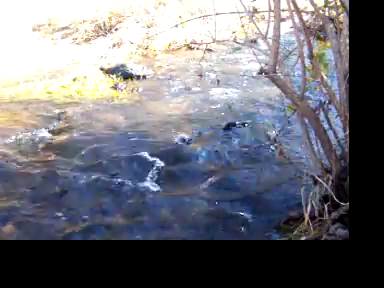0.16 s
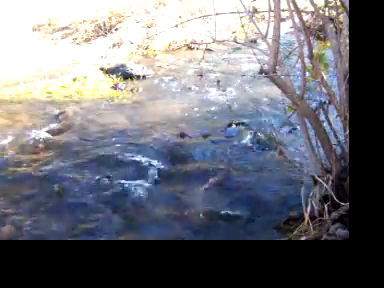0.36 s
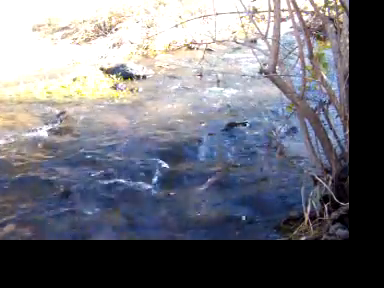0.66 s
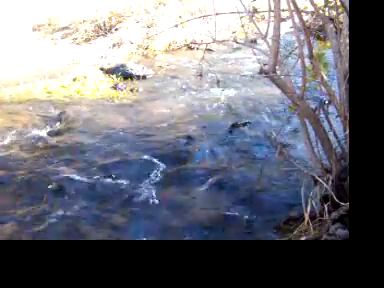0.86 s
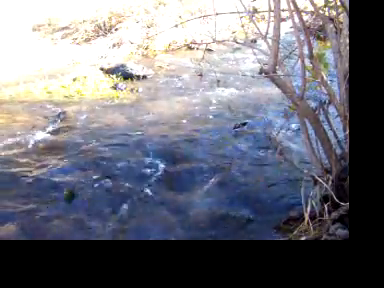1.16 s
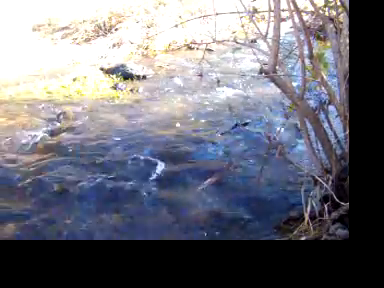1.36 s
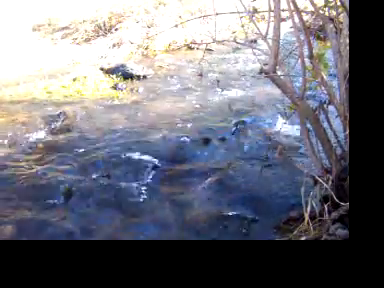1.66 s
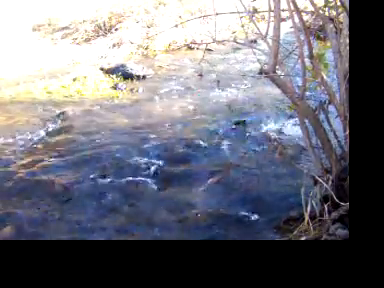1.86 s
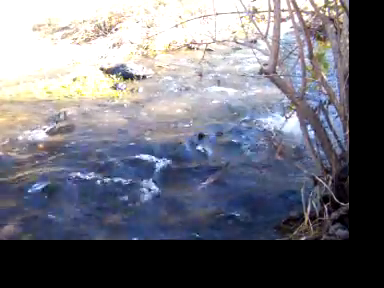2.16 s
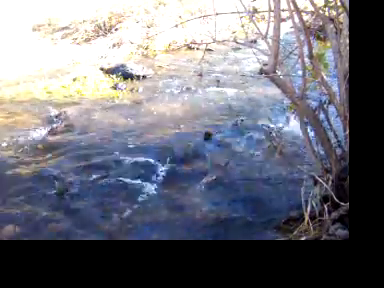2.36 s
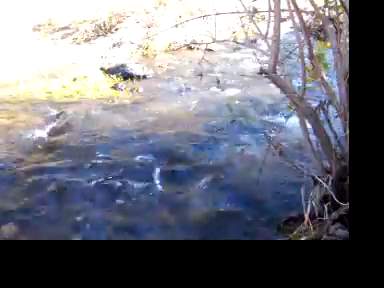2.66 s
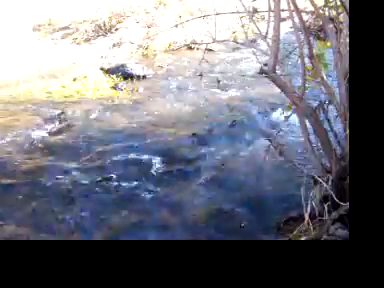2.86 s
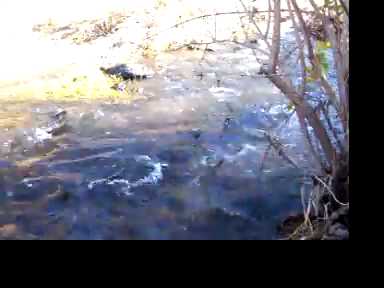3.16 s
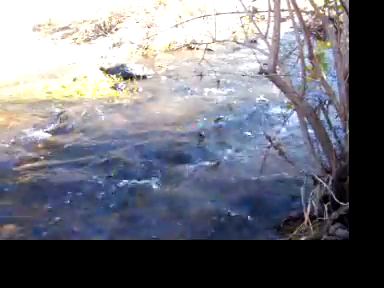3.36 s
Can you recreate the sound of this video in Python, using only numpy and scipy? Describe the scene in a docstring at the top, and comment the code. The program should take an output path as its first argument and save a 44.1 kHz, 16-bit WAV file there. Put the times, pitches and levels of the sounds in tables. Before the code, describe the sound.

A shallow stream rushes steadily over stones for about three and a half seconds, heard from the bank. Fine bubbling and spray ride on the flow, with small close plinks and drop splashes from around 0.4 seconds. Between 1.5 and 2.2 seconds the water churns harder and a run of deeper gurgles rises, strongest near 1.9. Scattered gurgles and drips continue over the rush to the end.

```python
"""A steady rush of water: a shallow stream over stones, from the bank, on a small mono microphone.
Swarms of tiny ringing bubbles and fine spray ride on it, swelling as the water churns and wavelets
break. Close to the microphone single bubbles plink and drops slap the surface; halfway through,
a run of big air pockets gurgles up. A limiter ducks the stream briefly after the sharpest peaks."""
import sys
import numpy as np
from scipy import signal
from scipy.fft import rfft, irfft, next_fast_len
from scipy.io import wavfile
from scipy.ndimage import uniform_filter1d

SR = 44100
rng = np.random.default_rng(int(sys.argv[2]) if len(sys.argv) > 2 else 0)


def dump_mix(stems):
    """Bounce the given channels to the path in sys.argv[1] as a 16-bit WAV at rate SR."""
    frames = np.atleast_2d(stems).T  # one column per channel
    limited = np.clip(frames, -1, 1)  # hard clip at full scale
    pcm = np.round(limited * 32767).astype(np.int16)
    wavfile.write(sys.argv[1], SR, pcm)


N = 154791

# how hard the water churns: t/s, level/dB
CHURN_LEVEL = [(0, -1.5), (.45, -1.5), (.55, -3), (.9, -1.5), (1.25, -2.1), (1.5, 0), (1.8, -2.5),
               (1.87, 8), (2, 0), (2.08, 0), (2.22, -.5), (2.35, 1.5), (2.68, 0.5), (2.9, 1.5), (3.1, 0.5),
               (3.3, 3), (3.43, -1), (3.51, 2)]
# wavelets breaking: t/s at the crest, length/s, extra churn/dB
WAVELETS = [(0.498, .03, 1.5), (1.002, 0.018, 1), (1.331, 0.028, 4), (1.509, 0.02, 9), (1.568, 0.025, 6),
            (1.608, .04, 4.5), (1.71, 0.039, 6.5), (1.796, 0.078, 6), (1.915, 0.015, 5.5),
            (2.116, 0.018, 4), (2.169, .04, 5), (2.276, 0.057, 2.5), (2.39, 0.029, 5), (2.537, 0.052, 2.5),
            (2.577, 0.052, 1.5), (2.718, 0.017, 5.5), (3.069, 0.038, 3.5), (3.19, .03, 0.5),
            (3.344, 0.033, 4)]
# the rush from the bank: f/Hz, relative level/dB
RUSH_SPECTRUM = [(15, -34), (28, -18.5), (60, -10), (90, -4.5), (109, -6.5), (130, -9), (200, -6),
                 (400, -5), (530, -5.5), (605, -2.5), (700, -8), (800, -7.5), (940, -11.5), (1070, -14),
                 (1190, -9.5), (1900, -8), (2500, -12), (3500, -11.5), (4800, -10), (6800, -15),
                 (7900, -25), (8800, -42), (9500, -76.5)]
# how closely the rush follows the churn: f/Hz, follow/(dB per dB)
RUSH_FOLLOW = [(100, .1), (600, 0.29), (1500, 0.48), (5000, 1.0)]
# bubble swarms: lowest f/Hz, highest f/Hz, rate/(1/s), spread/dB, level/dB, follow/(dB per dB), ring/cycles
BUBBLE_SWARMS = [(333, 560, 180, 5.5, -38, 1.5, 4), (579, 690, 160, 2, -33.5, 0.28, 9.5),
                 (700, 950, 90, 0, -42, 1.6, 4.6), (1196, 2200, 260, 3.5, -36.5, 1.35, 8.5),
                 (2310, 4000, 900, 4, -34, 0.45, 4.5), (3990, 7220, 1500, 5, -30.5, 0.56, 3)]
# fine spray: f/Hz, rate/(1/s), spread/dB, level/dB
FINE_SPRAY = [(3700, 200, 5, -36), (7700, 190, 4.5, -39)]
# small bubbles near the microphone: t/s, f/Hz, level/dB
CLOSE_BUBBLES = [(.353, 4840, -10), (.4033, 5370, -13), (0.415, 4150, -18), (.5003, 4500, -15),
                 (.482, 1890, -17), (.5065, 6300, -13.5), (0.5073, 4890, -11.5), (1.0132, 5100, -6),
                 (1.051, 4620, -10), (1.1765, 3450, -13.5), (1.366, 2440, -11), (1.511, 1630, -14),
                 (1.529, 1200, -20), (1.561, 2700, -17), (1.619, 1730, -20), (1.3085, 2040, -19),
                 (1.338, 2660, -14), (1.643, 1580, -17.5), (1.697, 1520, -21), (1.7933, 4470, -8),
                 (1.823, 6130, 2), (1.858, 2800, -8.5), (2.054, 1430, -12), (2.2668, 2600, -14),
                 (2.2695, 4550, -12), (2.276, 4620, -12), (2.2952, 4250, -9), (2.4117, 3120, -11.5),
                 (2.625, 1510, -18), (2.6368, 6360, -7), (2.646, 5530, -13), (2.719, 1400, -15),
                 (2.732, 1480, -13), (2.785, 1600, -16), (2.906, 1480, -14), (3.032, 5200, -14),
                 (3.0683, 5120, -10), (3.261, 1920, -13.5), (3.293, 4720, -12), (3.316, 1470, -20),
                 (3.3285, 1500, -19), (3.3445, 1450, -22), (3.364, 4270, -11), (3.365, 3320, -14.5)]
# drops slapping the surface: t/s, level/dB, f/Hz
DROPS = [(0.48, -2, 4600), (0.51, -1, 7300), (0.511, -9, 5230), (1.0515, -10, 4600), (1.18, -7, 6900),
         (1.264, -19, 4600), (1.3085, -1, 6500), (1.337, -1, 6440), (1.341, -11, 4600), (1.368, -2, 3000),
         (1.4148, -3, 6100), (1.619, -0.5, 3500), (1.8115, -11.5, 6900), (1.8234, -13, 7000),
         (2.2675, -13, 3500), (2.411, -1, 7500), (2.559, -9, 7500), (2.6464, 0, 5700), (3.074, -2, 7400),
         (3.359, -5, 7540), (3.384, 1.5, 7100), (3.4947, -0.5, 6700)]
# big air pockets close by: t/s, length/s, f/Hz at the loudest point, rise/octaves, level/dB
AIR_POCKETS = [(0.872, 0.078, 285.4, 0.2, -26), (1.263, 0.022, 967, 0.5, -25),
               (1.525, .018, 730, 0.3, -19.5), (1.7148, 0.0069, 632, -0.1, -5.5),
               (1.72, 0.0079, 680, 0.4, -15), (1.73, 0.021, 500, -0, -15.5), (1.741, 0.021, 664, 0.16, -14),
               (1.903, 0.0079, 570, 0, -7.5), (1.907, 0.01, 324, 0.57, -1.5), (1.915, 0.021, 610, 0.5, -11),
               (1.924, 0.063, 184, 0.94, -14), (1.928, 0.022, 627, .3, -11.5), (1.963, .021, 305, 1, -11),
               (1.974, 0.014, 445, .5, -10.5), (2.065, 0.016, 426, 0.2, -16),
               (2.087, 0.0096, 364, 0.2, -6.5), (2.098, 0.015, 510, 0.2, -16),
               (2.104, 0.018, 208, -0.7, -16.5), (2.111, 0.01, 667, -0, -14.5),
               (2.126, 0.029, 642, 0.5, -17.5), (2.152, 0.022, 402, -0.2, -14.5),
               (2.173, 0.015, 452, 0.3, -19), (2.261, 0.04, 303, -0.4, -23), (2.285, 0.017, 497, 0.4, -19),
               (2.421, 0.018, 416, 0.45, -10.5), (2.477, .016, 430, 0.4, -19),
               (2.509, 0.023, 456, 0.4, -19.5), (2.601, 0.019, 362, 0.16, -7.5),
               (2.617, 0.026, 362, -0.15, -17.5), (2.861, .016, 650, 0.7, -15.5),
               (2.979, 0.061, 232, -0.05, -21), (3.186, 0.034, 645, 0.06, -18),
               (3.276, 0.016, 710, 0.3, -18), (3.469, 0.018, 880, 0.2, -18),
               (3.476, 0.04, 767, 0.35, -16.5)]
# treble roll-off on everything but the rush: f/Hz, gain/dB
NEAR_ROLLOFF = [(5000, 0), (6500, -2), (7400, -1.5), (8200, -7.5), (8900, -26)]

RUSH_DB, PATCH_DB, FLICKER_DB = -24, 1.53, 1.5
RING_CYCLES, ONSET_CYCLES, RISE_PER_RING = 4.6, 1.13, 0.017  # plink decay; any bubble's attack, pitch rise
SATELLITE_DB, SATELLITE_S, SATELLITE_OCTAVES = -11, 0.01, 0.33  # round a plink: level, time and pitch scatter
TICK_DECAY_S = 0.00016
GURGLE_SKEW = 0.57  # under 1: swells faster than it dies
LIMIT_DB, LIMIT_ATTACK_S, RECOVER_DB_PER_S = -0.5, 0.002, 63
LIMIT_TREBLE_WEIGHT, BAND_EDGE_HZ = 2.09, 9076


def amp(db):
    """Decibels to gain."""
    return 10 ** (np.asarray(db) / 20)


def unit_rms(x):
    """Scales to rms 1."""
    return x / np.sqrt(np.mean(x ** 2) + 1e-20)


def at_hz(table, hz):
    """Reads a table on a log-frequency axis."""
    f, value = np.transpose(table)
    return np.interp(np.log(hz + 1), np.log(f + 1), value)


def add(mix, s, sound):
    """Mixes a sound in at time s."""
    part = mix[max(round(s * SR), 0):][:len(sound)]
    part += sound[:len(part)]


def churn():
    """How hard the water works, in dB: slow surges plus short swells as wavelets break."""
    t = np.arange(N) / SR
    wavelets = sum(db * np.exp(-(2 * (t - s) / length) ** 2) for s, length, db in WAVELETS)
    return np.interp(t, *np.transpose(CHURN_LEVEL)) + wavelets


def rush(churn_db, size=1024, hop=256):
    """The whole stream blends into one noise at the bank, with drifting patches and a quick flicker."""
    frames, hz = N // hop + 5, np.fft.rfftfreq(size, 1 / SR)
    real, imag, patches = rng.standard_normal((3, frames, len(hz)))
    patches = uniform_filter1d(patches, size=6, axis=0)  # smooth in time
    patches = unit_rms(uniform_filter1d(patches, size=12, axis=1))  # and in frequency
    surge_db = np.interp(np.arange(frames) * hop, np.arange(N), churn_db)[:, None] * at_hz(RUSH_FOLLOW, hz)
    spectra = (real + 1j * imag) * amp(at_hz(RUSH_SPECTRUM, hz) + PATCH_DB * patches + surge_db)
    noise = signal.istft(spectra.T, nperseg=size, noverlap=size - hop)[1][:N]
    flicker = unit_rms(uniform_filter1d(rng.standard_normal(N), size=400))
    return amp(RUSH_DB) * unit_rms(noise * amp(FLICKER_DB * flicker))


def impacts(per_s, spread_db):
    """Random impulses: many small, a few large."""
    size = amp(spread_db * np.minimum(rng.exponential(1, N), 4))
    return size * rng.choice([-1, 1], N) * (rng.random(N) < per_s / SR)


def bubble(hz, ring_cycles):
    """A bubble rings for a few cycles, rising in pitch as it nears the surface."""
    cycles = np.arange(0, 6 * ring_cycles, hz / SR)
    age = cycles / ring_cycles
    envelope = (1 - np.exp(-cycles / ONSET_CYCLES)) * np.exp(-age)
    return envelope / envelope.max() * np.sin(2 * np.pi * cycles * (1 + RISE_PER_RING * age / 2))


def swarm(churn_db, lo_hz, hi_hz, per_s, spread_db, db, follow, ring_cycles, sizes=16):
    """Countless bubbles of one range of sizes, louder where the water churns."""
    pitches = lo_hz * (hi_hz / lo_hz) ** ((np.arange(sizes) + rng.random(sizes)) / sizes)
    ringing = np.zeros(N)
    for hz in pitches:
        ringing += signal.oaconvolve(impacts(per_s / sizes, spread_db), bubble(hz, ring_cycles))[:N]
    return amp(db) * unit_rms(ringing * amp(follow * churn_db))


def drop_tick(hz):
    """The brief tick of a drop landing on the water."""
    t = np.arange(64) / SR
    return np.exp(-t / TICK_DECAY_S) * np.sin(2 * np.pi * hz * t)


def spray(churn_db, hz, per_s, spread_db, db):
    """Fine droplets fall back on the stream, louder as it churns."""
    ticks = signal.oaconvolve(impacts(per_s, spread_db), drop_tick(hz))[:N]
    return amp(db) * unit_rms(ticks * amp(churn_db))


def plinks(satellites=4):
    """Bubbles ring close to the microphone, each with a few weaker ones trapped alongside."""
    out = np.zeros(N)
    clusters = rng.uniform(-1, 1, (len(CLOSE_BUBBLES), satellites, 2))
    for (s, hz, db), cluster in zip(CLOSE_BUBBLES, clusters):
        add(out, s, amp(db) * bubble(hz, RING_CYCLES))
        for offset, detune in cluster:
            satellite = bubble(hz * 2 ** (SATELLITE_OCTAVES * detune), RING_CYCLES)
            add(out, s + SATELLITE_S * offset, amp(db + SATELLITE_DB) * satellite)
    return out


def gurgle(length_s, hz, octaves, db):
    """A large air pocket close by swells, glides in pitch and closes."""
    progress = np.arange(0, length_s, 1 / SR) / length_s
    crest = 0.5 ** (1 / GURGLE_SKEW)
    pitch = hz * 2 ** (octaves * (progress - crest))
    envelope = np.sin(np.pi * progress ** GURGLE_SKEW) ** 2
    return amp(db) * envelope * np.sin(2 * np.pi * np.cumsum(pitch) / SR)


def scene():
    """From the bank: bubbles, spray, drops and gurgles up close, the rush behind them."""
    churn_db = churn()
    near = plinks()
    near += sum(spray(churn_db, *row) for row in FINE_SPRAY)
    near += sum(swarm(churn_db, *row) for row in BUBBLE_SWARMS)
    for s, db, hz in DROPS:
        add(near, s, amp(db) * drop_tick(hz))
    for s, *pocket in AIR_POCKETS:
        add(near, s, gurgle(*pocket))
    size = next_fast_len(N)
    rolloff = amp(at_hz(NEAR_ROLLOFF, np.fft.rfftfreq(size, 1 / SR)))
    near = irfft(rfft(near, size) * rolloff, size)[:N]
    return (near + rush(churn_db))[None]


def record(dry):
    """After the microphone, a limiter ducks on sharp, bright peaks and a low-pass cuts the top."""
    detector = abs(dry[0] + LIMIT_TREBLE_WEIGHT * np.diff(dry[0], prepend=0))
    over_db = np.maximum(20 * np.log10(detector + 1e-9) - LIMIT_DB, 0)
    recovery_db = np.arange(N) * RECOVER_DB_PER_S / SR
    held_db = np.maximum.accumulate(over_db + recovery_db) - recovery_db  # each peak ebbs at a steady rate
    pole = np.exp(-1 / (LIMIT_ATTACK_S * SR))
    duck_db = signal.lfilter([1 - pole], [1, -pole], held_db)
    lowpass = signal.firwin(511, BAND_EDGE_HZ, window=("kaiser", 9), fs=SR)
    return signal.oaconvolve(dry * amp(-duck_db), lowpass[None], "same")


dry = scene()
out = record(dry)
dump_mix(out)
```